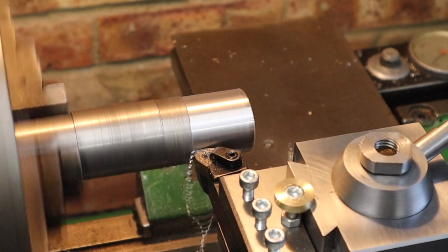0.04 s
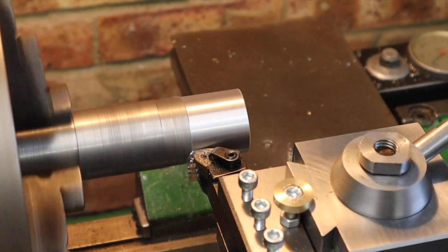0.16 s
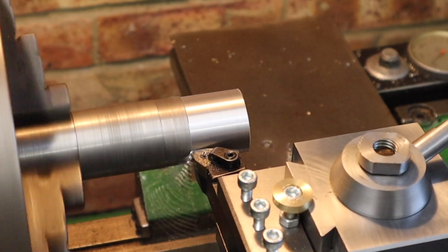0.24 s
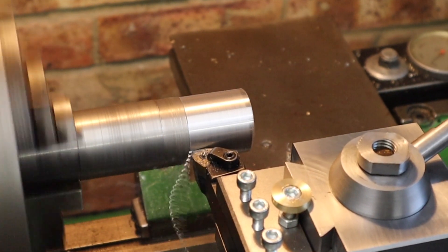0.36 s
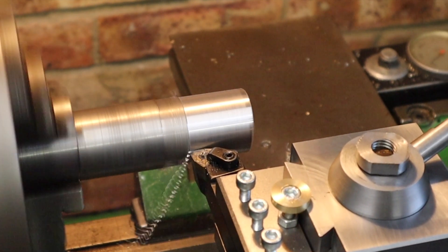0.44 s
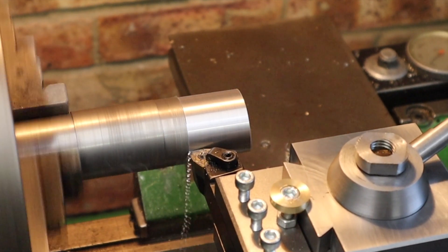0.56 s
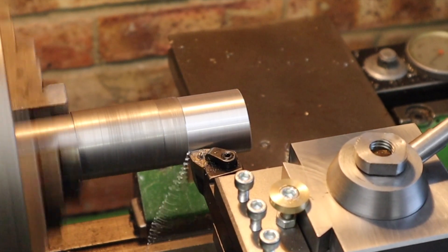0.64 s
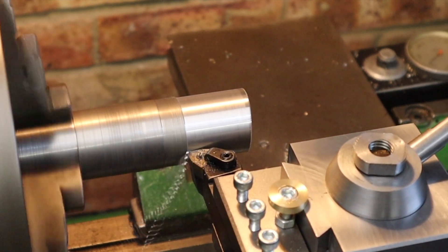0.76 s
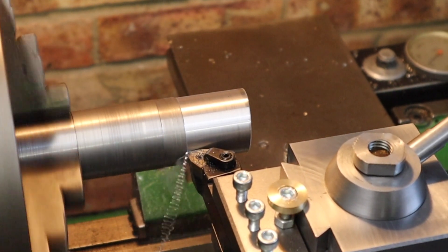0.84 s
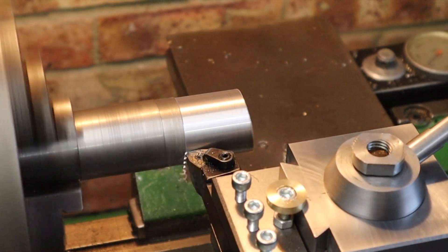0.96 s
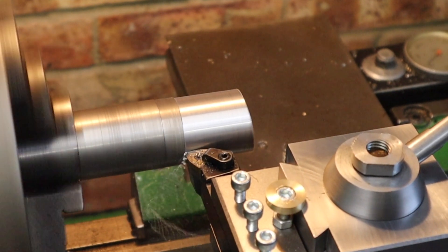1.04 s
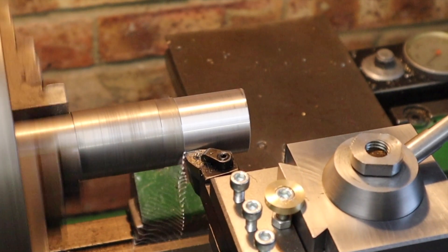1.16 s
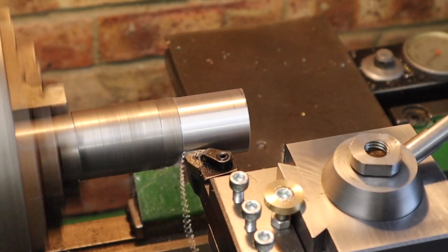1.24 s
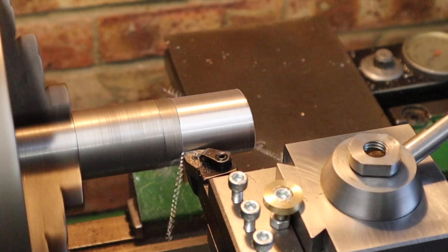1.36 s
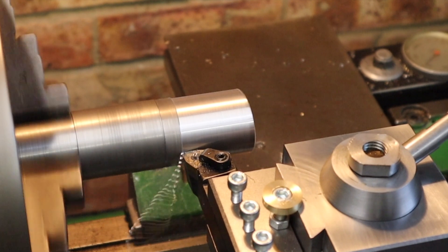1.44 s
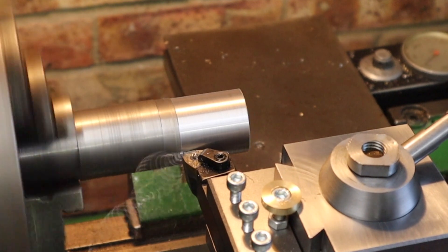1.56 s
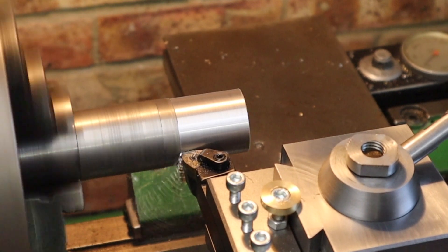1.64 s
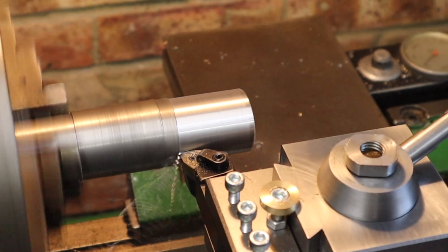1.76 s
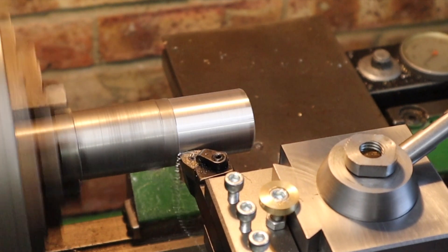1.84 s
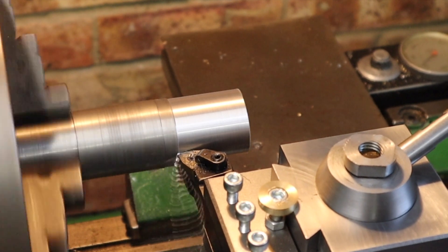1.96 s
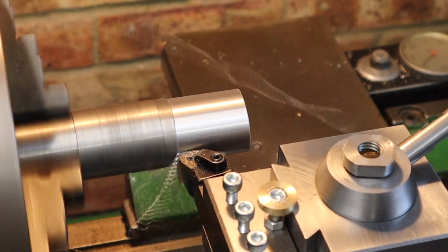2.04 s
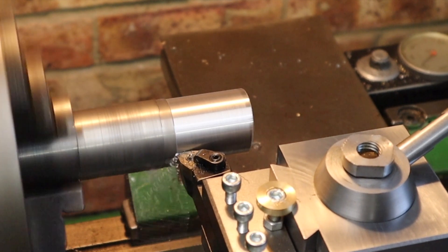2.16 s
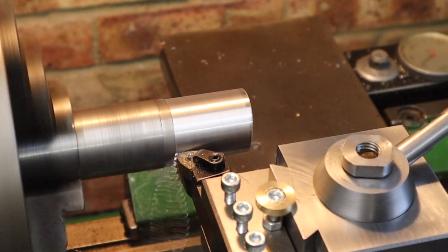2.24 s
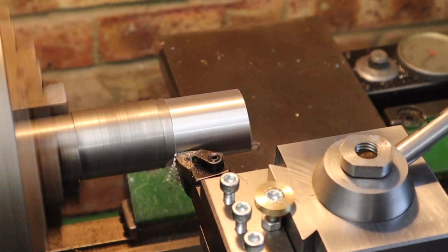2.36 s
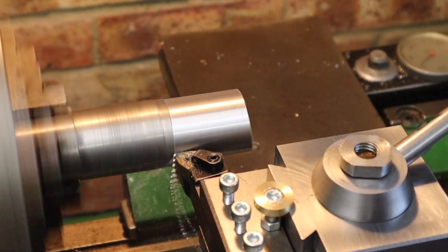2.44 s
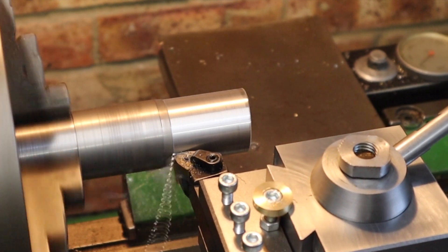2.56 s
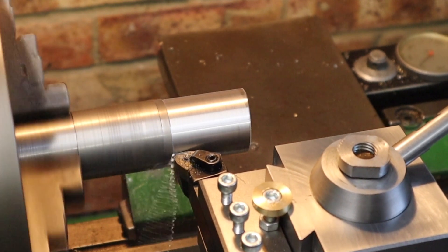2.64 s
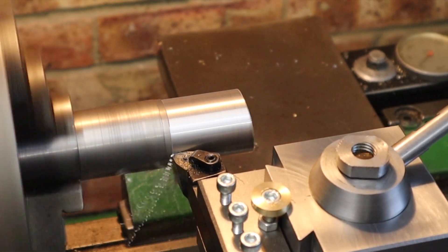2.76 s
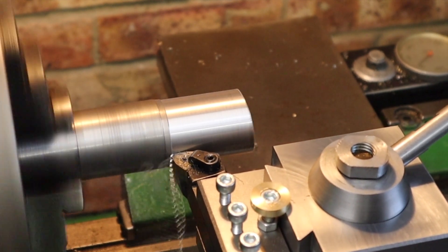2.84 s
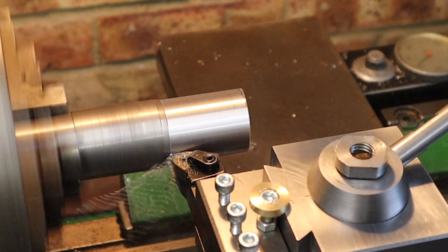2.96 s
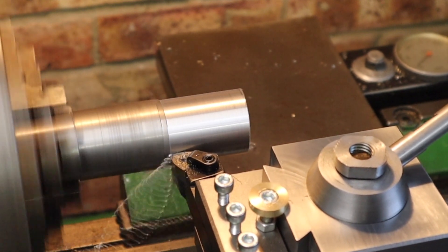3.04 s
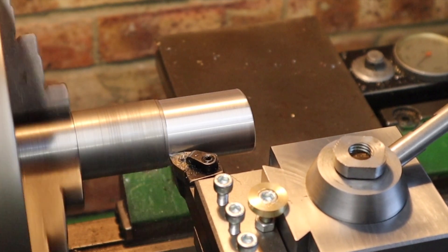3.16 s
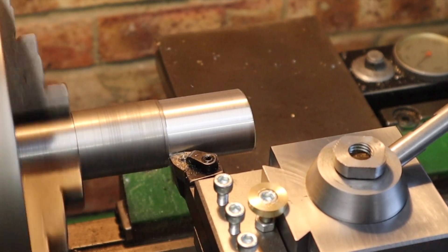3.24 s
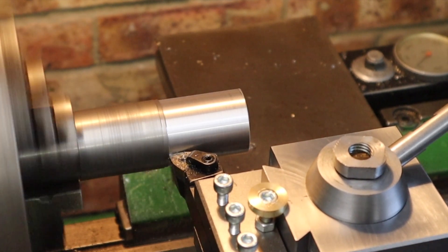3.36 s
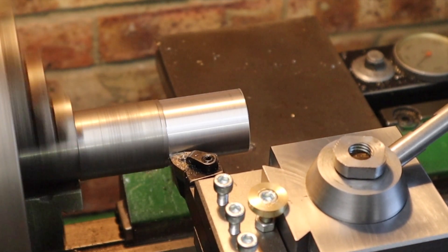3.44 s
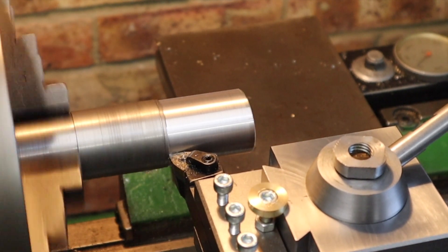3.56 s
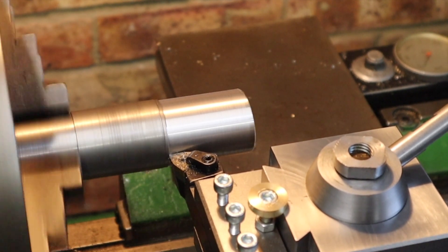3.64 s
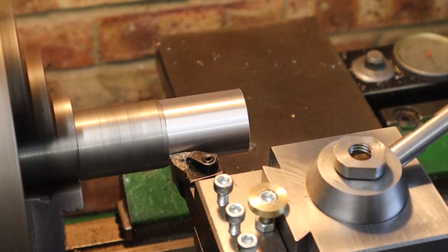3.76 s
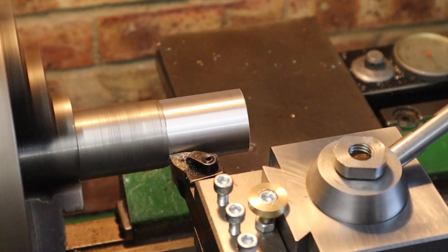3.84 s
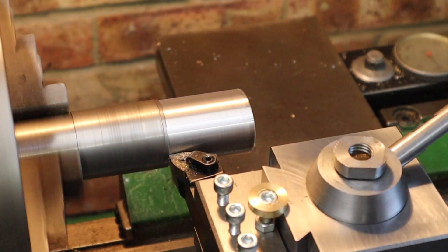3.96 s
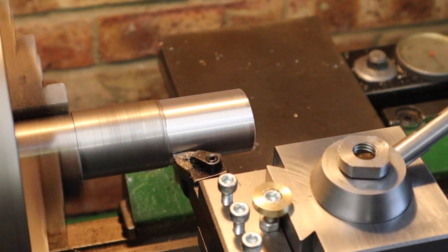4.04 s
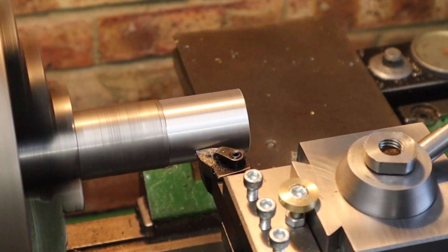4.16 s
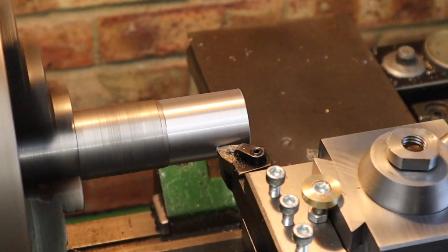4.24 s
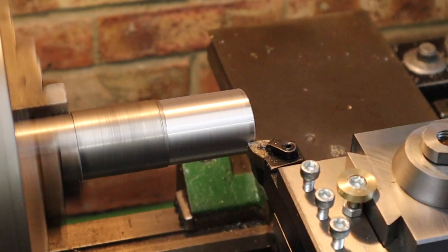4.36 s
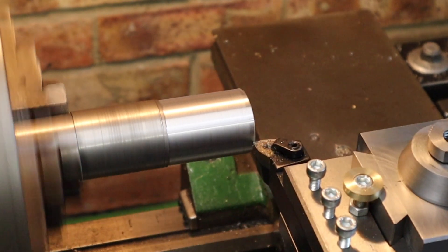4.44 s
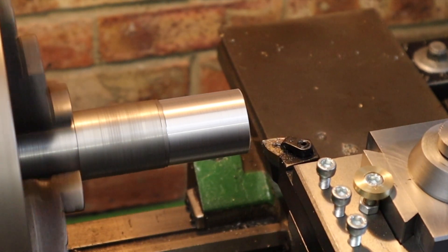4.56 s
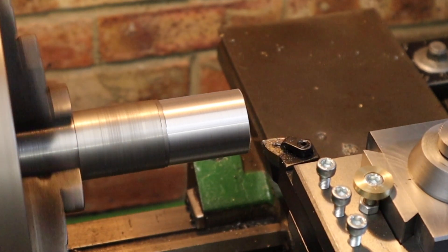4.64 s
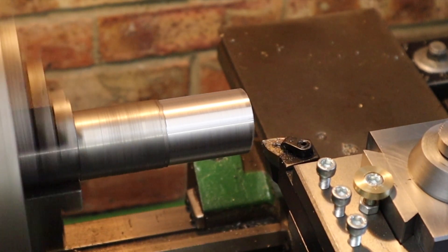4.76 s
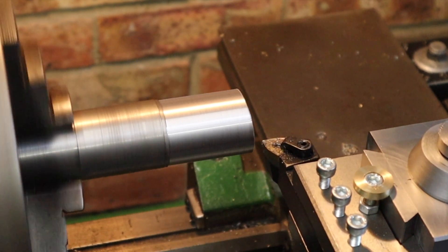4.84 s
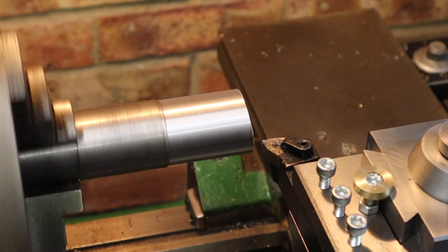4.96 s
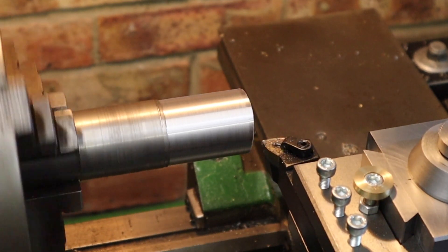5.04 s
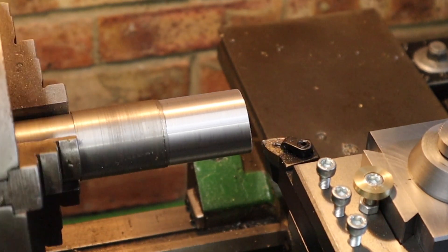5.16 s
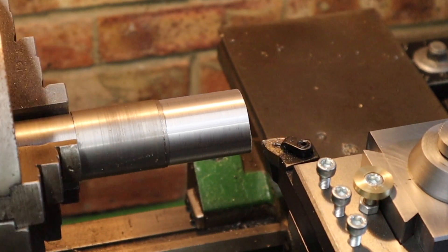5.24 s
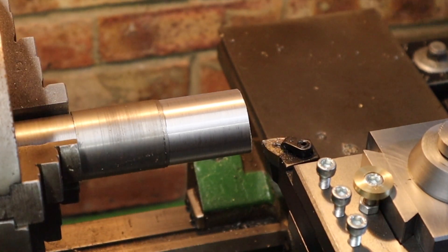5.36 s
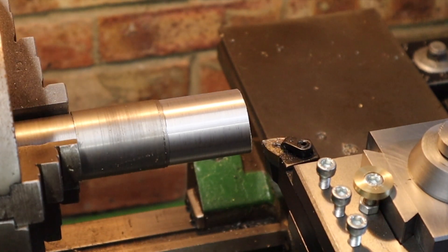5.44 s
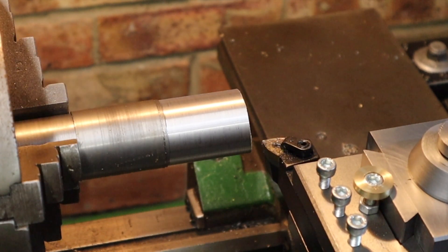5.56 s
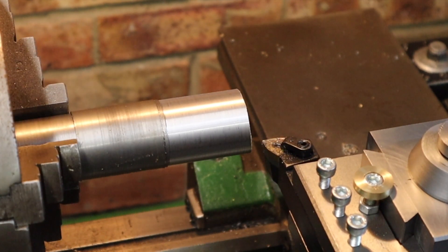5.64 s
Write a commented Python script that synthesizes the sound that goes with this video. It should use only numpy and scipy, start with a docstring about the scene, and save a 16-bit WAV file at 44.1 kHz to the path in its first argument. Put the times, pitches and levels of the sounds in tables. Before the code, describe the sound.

Close in a workshop, a small lathe cuts a steel bar: steady motor hum, high whine and dense gritty hiss of gears and sliding chip. At about three seconds the chip breaks off and the machine runs a little freer and clearer. Just before five seconds power is cut with a loud metallic clack; the gears rattle and sink to a stop, leaving faint room hiss, light clunks and a short swish. Mono microphone.

```python
"""Small lathe at work

A small lathe turns a steel bar, close to a mono microphone. Hum is a sum of mains-ripple multiples; whine is
tones locked to motor speed; gears and chip are noise and tiny impacts filtered by the machine's resonances.
The cut ends, the motor runs a little freer, then power goes off and the spindle coasts to rest.
Clunks of the controls and a short swish follow: filtered noise bursts, over a faint workshop hiss and hum."""
import sys
import numpy as np
from scipy import signal
from scipy.fft import rfft, irfft
from scipy.io import wavfile
from scipy.ndimage import uniform_filter1d

SR = 44100
rng = np.random.default_rng(int(sys.argv[2]) if len(sys.argv) > 2 else 0)


def persist_wave(psi):
    """Save psi, clipped to +-1, as 16-bit WAV."""
    counts = np.round(np.clip(psi, -1, 1) * 32767).astype(np.int16)
    wavfile.write(sys.argv[1], SR, np.atleast_2d(counts).T)


N = 251356
T = np.arange(N) / SR
HZ = np.fft.rfftfreq(N, 1 / SR)


def amp(db):
    """Decibels to gain."""
    return 10 ** (np.asarray(db) / 20)


def unit(x):
    """Scales to rms 1."""
    return x / np.sqrt(np.mean(x ** 2) + 1e-20)


def shape(points):
    """Gain at every frequency, interpolated in dB over log frequency."""
    hz, db = np.transpose(points)
    return amp(np.interp(np.log(HZ + 1), np.log(hz + 1), db))


def colour(x, gain):
    """Filters by a gain per frequency; rms 1."""
    return unit(irfft(rfft(x) * gain, N))


def causal(gain):
    """Gives a gain per frequency the phase of something that rings only after it is struck."""
    return np.exp(np.conj(signal.hilbert(np.log(gain))))


def noise():
    """White noise."""
    return rng.standard_normal(N)


def wander(rate_hz):
    """Slow random sway with a Gaussian roll-off at a rate; rms 1."""
    times = np.arange(0, T[-1] + .01, .001)
    hz = np.fft.rfftfreq(len(times), times[1])
    spectrum = rfft(rng.standard_normal(len(times))) * np.exp(-(hz / rate_hz) ** 2)
    slow = irfft(spectrum, len(times))
    return np.interp(T, times, unit(slow))


def angle(hz):
    """Phase of something that turns at a changing rate, from a random start."""
    return 2 * np.pi * np.cumsum(hz * np.ones(N)) / SR + rng.uniform(0, 2 * np.pi)


def tone(hz, rough):
    """A whistle of rms 1, partly clean and partly fuzzy."""
    phase = angle(hz)
    return unit((1 + rough * wander(26)) * np.sin(phase) + rough * wander(7.7) * np.cos(phase))


def grains(per_s, spread_db):
    """Tiny impacts of uneven size at random moments, each scattered for a millisecond or two."""
    size = amp(spread_db * np.minimum(rng.exponential(1, N), 3))
    hits = size * (rng.random(N) < per_s / SR)
    energy = signal.lfilter([1], [1, -np.exp(-1 / (0.0008 * SR))], hits ** 2)
    return unit(np.sqrt(energy) * noise())


def after(s):
    """Seconds since a moment; zero before it."""
    return np.maximum(T - s, 0)


def settle(s, lag_s):
    """Rises from 0 towards 1 after a moment."""
    return 1 - np.exp(-after(s) / lag_s)


def bursts(rows):
    """Level of a few short Gaussian bursts."""
    return sum(amp(db) * np.exp(-.5 * ((T - s) / length_s) ** 2) for s, db, length_s in rows)


# Workshop hiss. Each row: frequency in Hz, relative density in dB per Hz.
IDLE_HISS = [(30, -9), (100, -7), (220, -2), (600, -3), (1100, -5), (2300, -7.5), (3450, 0), (4600, -10),
             (8000, -13), (15500, -15)]
# Workshop hum. Each row: frequency in Hz, level in dB.
IDLE_HUM = [(178, -58), (400.7, -56.5), (1202, -67), (1603, -75)]


def idle():
    """The workshop's steady hiss and a faint hum come forward as the machine falls quiet."""
    lines = sum(np.sqrt(2) * amp(db + 1.2 * wander(7.8)) * np.sin(angle(hz)) for hz, db in IDLE_HUM)
    stopped = np.interp(T, [4.98, 5.2], [.12, 1])
    return stopped * (amp(-49.0) * colour(noise(), shape(IDLE_HISS)) + lines)


DRONE_HELD_HZ, DRONE_HOLD_FROM_S, DRONE_HOLD_TO_S = 223.5, 1.05, 2.18
# away from the hold: higher pitch, lower level
DRONE_RISE_HZ, DRONE_GLIDE_S, DRONE_FADE_DB_PER_S = 80, .15, 24
DRONE_DB, DRONE_SWELL_DB, DRONE_SWELL_AT_S = -55.5, 7, 1.6


def drone():
    """A faint low tone sinks to a held pitch, swells, then rises and fades during the cut."""
    away_s = np.maximum(DRONE_HOLD_FROM_S - T, 0) + after(DRONE_HOLD_TO_S)
    hz = DRONE_HELD_HZ + DRONE_RISE_HZ * (1 - np.exp(-away_s / DRONE_GLIDE_S))
    swell_db = DRONE_SWELL_DB * settle(DRONE_SWELL_AT_S, .04)
    db = DRONE_DB + swell_db - DRONE_FADE_DB_PER_S * away_s
    return np.sqrt(2) * amp(db + 1.3 * wander(8)) * np.sin(angle(hz))


# Soft bumps in the bench. Each row: start in seconds, pitch in Hz, level before decay in dB, decay in seconds.
BENCH_BUMPS = [(.05, 117.5, -47.5, 0.13), (1.039, 145, -58, .06), (4.07, 262, -47, 0.067)]


def bumps():
    """Dull, low knocks in the bench: short decaying tones."""
    out = np.zeros(N)
    for s, hz, db, decay_s in BENCH_BUMPS:
        envelope = settle(s, 0.0038) * np.exp(-after(s) / decay_s)
        out += amp(db) * tone(hz, rough=0.27) * envelope
    return out


# Swish at its height. Each row: frequency in Hz, relative density in dB per Hz.
SWISH_SPECTRUM = [(240, -74), (400, -31), (784, -12), (834, -10), (1050, -6.5), (1420, -8), (1760, -5),
                  (1930, -14), (2120, -6.5), (2750, -13), (4290, -14), (5310, -9), (5910, -15),
                  (8150, -12.5), (15500, -10)]
SWISH_AT_S, SWISH_DB = 5.484, -25.5
SWISH_ATTACK_S, SWISH_HOLD_S, SWISH_RELEASE_S = 0.016, 0.045, 0.017


def swish():
    """A short sliding swish: a thin hiss that fills out with two hollow resonances at its height."""
    hollow = 1 + sum(1.5 / (1 + (2 * (HZ - hz) / 50) ** 2) for hz in (1068, 1722))
    rise = np.maximum(SWISH_AT_S - T, 0) / SWISH_ATTACK_S
    fall = after(SWISH_AT_S + SWISH_HOLD_S) / SWISH_RELEASE_S
    stroke = np.exp(-rise - fall)
    full_share = 0.99 * stroke ** 0.22
    thin_share = np.sqrt(np.maximum(1 - full_share ** 2, 0))
    full = colour(noise(), shape(SWISH_SPECTRUM) * hollow)
    thin = colour(noise(), np.exp(-((HZ - 10200) / 2500) ** 2))
    return amp(SWISH_DB) * stroke * (full_share * full + thin_share * thin)


# Controls and toolpost. Each row: start in seconds, click level in dB, click decay in seconds,
# rattle length in seconds, knock level before its envelope in dB, knock pitch in Hz, thump gain in dB.
CONTROL_CLUNKS = [(4.893, -14, 0.0044, 0.0054, -24, 432, -76),
                  (5.303, -35, 0.0053, 0.013, -55, 1050, -35.5),
                  (5.402, -32.5, 0.0026, 0.00086, -64, 1000, -70),
                  (5.629, -35, 0.0059, 0.0028, -31.5, 950, -36.5)]
# Steel on steel. Each row: frequency in Hz, relative density in dB per Hz.
STEEL_CLICK = [(100, -47), (300, -26), (1000, -5), (2500, -5), (3600, 4), (6500, -3.5), (9000, -3),
               (13000, -11), (16000, -3.5)]
# Bench modes under a clunk. Each row: frequency in Hz, level before the thump gain in dB, t60 in seconds.
BENCH_MODES = [(72, -14, .25), (126, -3.5, 0.17), (168, -9, .25), (231, -0.5, 0.22), (342, -10, 0.11)]


def clunks(ring):
    """Each is a bright rattle of steel parts that rings the machine, a hollow knock and a thump in the bench."""
    out = np.zeros(N)
    steel = causal(unit(shape(STEEL_CLICK) * abs(ring) ** 0.53))
    for s, click_db, decay_s, rattle_s, knock_db, knock_hz, thump_db in CONTROL_CLUNKS:
        age_s = after(s)
        fade = np.exp(-after(s + rattle_s) / decay_s) + amp(-25) * np.exp(-age_s / 0.024)
        click = irfft(rfft(noise() * fade * (T >= s)) * steel, N)
        # the knock swells over a few milliseconds and dies within a few of its own cycles
        hollow = 1 / np.sqrt(1 + (np.log((HZ + 1) / knock_hz) / 0.081) ** 4)
        swell = 1 - np.exp(-(age_s / 0.0016) ** 2)
        knock = colour(noise(), hollow) * np.exp(-age_s * knock_hz / 9) * swell
        thump = sum(amp(db - 60 * age_s / t60_s) * np.sin(2 * np.pi * hz * age_s)
                    for hz, db, t60_s in BENCH_MODES)
        out += amp(click_db) * click + amp(knock_db) * knock + amp(thump_db) * thump * settle(s, .004)
    return out


CUT_END_S, RUN_OUT_S = 3.17, .08
FREE_SPEED_GAIN, SPEED_LAG_S = .0053, .16  # gain as a share of cutting speed
POWER_OFF_S, COAST_S = 4.795, 0.45
COAST_EASE = 1.2  # exponent; above 1 the braking eases towards rest


def motion():
    """Share of the full cut, and speed as a share of cutting speed: load off, then friction braking."""
    cut = np.clip(1 - after(CUT_END_S) / RUN_OUT_S, 0, 1)
    driven = 1 + FREE_SPEED_GAIN * settle(CUT_END_S, SPEED_LAG_S)
    braked = np.clip(1 - after(POWER_OFF_S) / COAST_S, 0, 1) ** COAST_EASE
    return cut, driven * braked


# Casting, chuck and bar. Each row: frequency in Hz, width in Hz, lift (hollow if negative) in dB.
BODY_MODES = [(293, 61, 10.5), (372, 29, -9), (444, 58, 16), (497, 18, 17), (580, 30, -9), (623, 66, 8.5),
              (763, 25, 3.5), (1035, 110, -3.5), (1116, 33, 5), (1287, 91, 4.5), (1459, 25, 10.5),
              (2190, 74, -7), (2284, 190, 4), (2440, 87, 2.5), (2760, 130, -5), (3750, 320, 2.5),
              (4010, 170, -3), (4102, 82, 8.5), (4260, 160, -8), (4400, 84, 3), (4730, 190, -2.5),
              (5070, 220, 4), (5460, 280, 3), (5890, 230, 5), (7280, 290, -2.5), (8300, 82, 3),
              (8440, 79, 7.5), (8740, 125, 11), (10500, 150, 6), (13200, 780, 2)]


def body():
    """Resonances of the machine over a slight ripple of many weak modes; they ring after a blow."""
    lift_db = sum(db / (1 + (2 * (HZ - hz) / width_hz) ** 2) ** 1.78 for hz, width_hz, db in BODY_MODES)
    smooth = uniform_filter1d(rng.standard_normal(len(HZ)), size=130)
    ripple = unit(uniform_filter1d(smooth, size=90))
    return causal(amp(lift_db + 1.83 * ripple))


# Loose gears around power-off. Each row: peak time in seconds, level in dB, Gaussian length in seconds.
GEAR_RATTLES = [(4.787, -22, .006), (4.868, -26, 0.0088), (5.004, -30, .008), (5.043, -29, 0.0063),
                (5.095, -35, 0.011), (5.2, -44, .014)]
MESH_HZ, MESH_DB = 1712, -40  # pitch at cutting speed; level before resonance and slowing
GEARBOX_HZ, GEARBOX_WIDTH_HZ, GEARBOX_LIFT_DB = 1330, 270, 5.5


def coasting(speed, ring):
    """Off power, the gear mesh sinks in pitch through a gearbox resonance and the slack teeth rattle."""
    hz = MESH_HZ * speed
    lift_db = GEARBOX_LIFT_DB / (1 + (2 * (hz - GEARBOX_HZ) / GEARBOX_WIDTH_HZ) ** 2)
    level = amp(MESH_DB + lift_db) * speed * settle(POWER_OFF_S, 0.022)
    mesh = tone(hz * (1 + .06 * wander(200)), rough=.8)
    rattle = bursts(GEAR_RATTLES) * colour(grains(900, 2.6), ring * shape(STEEL_CLICK))
    return level * mesh + rattle


# Rectified mains in the motor. Each row: multiple of the ripple frequency, relative level in dB.
HUM_LINES = [(2, -66.5), (4, -24.5), (6, -48.5), (8, -38.5), (9, -51.5), (11, -41.5), (12, -42.5),
             (16, -45)]
RIPPLE_HZ = 100.18
# nominal level of the strongest line in the cut, its rise running free, lag of the rise
HUM_DB, HUM_FREE_RISE_DB, HUM_LAG_S = -26, 2.3, 0.36


def hum(spindle):
    """Current pulses shake the motor at multiples of the mains ripple until the power is cut."""
    ripple = angle(RIPPLE_HZ) + 0.034 * np.sin(spindle) + 0.0085 * wander(12)
    top_db = max(db for _, db in HUM_LINES)
    out = np.zeros(N)
    for multiple, db in HUM_LINES:
        waver_db = .35 if db == top_db else 2  # the strongest line is the steadiest
        gain = amp(db - top_db + waver_db * (wander(24) - 0.4))
        out += gain * np.sin(round(multiple) * ripple + rng.uniform(0, 2 * np.pi))
    level = amp(HUM_DB + HUM_FREE_RISE_DB * settle(CUT_END_S, HUM_LAG_S))
    return np.sqrt(2) * level * out * np.exp(-after(POWER_OFF_S) / 0.01)


# Motor and gear tones. Each row: pitch at cutting speed in Hz, level in the cut in dB, level running free in dB.
WHINE_TONES = [(1712, -43.8, -43.3), (1986, -42.0, -45.8), (2112, -35.9, -46.4), (3022, -33.5, -35.2),
               (3055, -34.0, -29.3), (3154, -37.1, -32), (3273, -38.3, -54.0), (3316, -28.8, -35.1),
               (3424, -30.7, -23), (3453, -29.5, -28.3), (3483, -34.0, -37.4), (3655, -39.4, -37.7),
               (3823, -35.6, -38.9), (5136, -36.5, -34.2), (5422, -41.5, -39.5), (5932, -54.0, -41.7),
               (6847, -28.7, -34.3), (7571, -53.9, -43.3), (10272, -40.7, -42), (11985, -36.0, -40.5)]


def whine(speed, cut, spindle, belt):
    """Motor and gear tones follow the speed, which sways with chuck and belt; close pairs throb."""
    sway = 1 + .0011 * np.sin(spindle) + .0005 * wander(9) + .0006 * np.sin(belt)
    out = np.zeros(N)
    for hz, cut_db, free_db in WHINE_TONES:
        level = cut * amp(cut_db) + (1 - cut) * amp(free_db)
        strong = max(cut_db, free_db) > -30
        # strong tones are the cleanest; the cut roughens them all
        rough = (.06 if strong else .24) + 0.047 * cut
        out += level * tone(hz * speed * sway, rough)
    return out * np.exp(-after(POWER_OFF_S) / 0.0051)


# Belt (first row), shaft and gear beats. Each row: rate at cutting speed in Hz, depth in the cut,
# depth running free (both as a share of the level).
SHAFT_BEATS = [(28.45, .02, .08), (35.8, .05, .02), (141.6, .06, .02), (272, .02, .08), (370.3, .03, .08),
               (400.7, .06, .02)]
# Gears and brushes at speed. Each row: frequency in Hz, relative density in dB per Hz.
GEAR_SPECTRUM = [(30, -40), (100, -36.5), (200, -29), (360, -21.5), (520, -14.5), (1000, -14.5),
                 (1400, -9.5), (2100, -6), (3300, 0.5), (4700, -6), (7300, -9.5), (12500, -10),
                 (15500, -16)]
# Slowly turning gears. Each row: frequency in Hz, relative density in dB per Hz.
SLOW_GEAR_SPECTRUM = [(100, -37), (300, -22), (450, -14.5), (750, -1.5), (1400, -3), (2000, 0.5), (3100, 4),
                      (4000, -3.5), (6000, -13), (9000, -19), (15500, -18)]
# Chip sliding over the tool. Each row: frequency in Hz, relative density in dB per Hz.
CHIP_SPECTRUM = [(100, -36), (500, -35), (730, -4.5), (1000, -13), (2000, -3), (3000, -20), (4900, 4.5),
                 (6500, -7), (9500, -17), (13000, 1), (15500, -18)]
# Last chips as the tool leaves the cut. Each row: peak time in seconds, level in dB, Gaussian length in seconds.
CHIP_BREAKS = [(3.197, -21, .007), (3.235, -21, 0.013), (3.3, -24.5, 0.014)]
# Breaking chip. Each row: frequency in Hz, relative density in dB per Hz.
SNAP_SPECTRUM = [(300, -30), (800, 0), (1200, -1), (2000, -5), (5000, -8), (8000, -14), (13000, -2),
                 (15500, -16)]
GEARS_DB, CHIP_DB = -18.5, -25.5
GEARS_FREE_DB = -0.1  # change from cut to free, half on either side of GEARS_DB
SLACK_DB, SLACK_S = -4, .007  # teeth go slack off power


def running(speed, cut, ring):
    """Teeth, brushes and the breaking chip rattle the machine in time with its shafts; noise falls with speed."""
    beat = 1 + sum((cut * cut_depth + (1 - cut) * free_depth) * np.sin(angle(hz * speed))
                   for hz, cut_depth, free_depth in SHAFT_BEATS)
    flutter = amp(0.085 * wander(70))
    gears = colour((noise() + 0.52 * grains(1200, 1.4)) * beat, ring * shape(GEAR_SPECTRUM))
    chip = colour((noise() + 0.91 * grains(900, 3)) * beat, ring * shape(CHIP_SPECTRUM))
    # slow teeth strike more softly and lose their treble
    slow = colour(grains(1600, 1.5), ring * shape(SLOW_GEAR_SPECTRUM))
    fast = np.clip((speed - .2) / 0.67, 0, 1)
    drive = np.sqrt(fast) * gears + np.sqrt(1 - fast) * slow
    drive_db = GEARS_DB + GEARS_FREE_DB * (0.5 - cut) + SLACK_DB * settle(POWER_OFF_S, SLACK_S)
    snaps = bursts(CHIP_BREAKS) * colour(grains(900, 2.4), ring * shape(SNAP_SPECTRUM))
    return flutter * (amp(drive_db) * speed * drive + amp(CHIP_DB) * cut * chip) + snaps


SPINDLE_HZ = 6.75  # at cutting speed


def scene():
    """All sources reach one microphone; both channels are alike."""
    cut, speed = motion()
    ring = body()
    spindle = angle(SPINDLE_HZ * speed)
    belt = angle(SHAFT_BEATS[0][0] * speed)
    background = idle() + drone() + bumps() + swish() + clunks(ring)
    lathe = coasting(speed, ring) + hum(spindle) + whine(speed, cut, spindle, belt) + running(speed, cut, ring)
    mono = background + lathe
    return np.array([mono, mono])


EDGE_HZ = 15780


def record(dry):
    """Band limit: a steep linear-phase low-pass."""
    taps = signal.firwin(511, EDGE_HZ, window=("kaiser", 9), fs=SR)
    return signal.oaconvolve(dry, taps[None], "same")


dry = scene()
out = record(dry)
persist_wave(out)
```